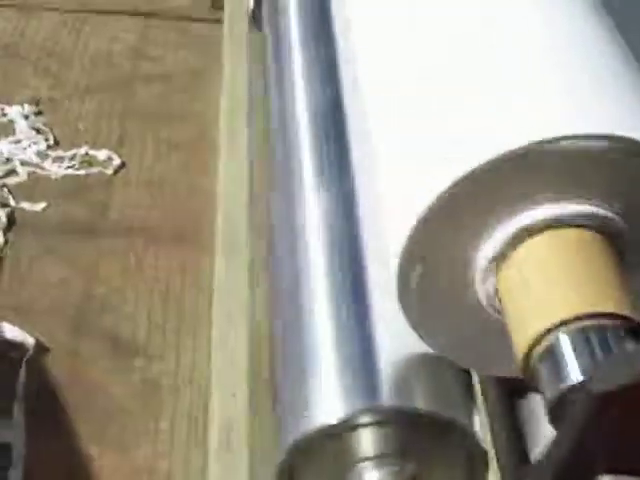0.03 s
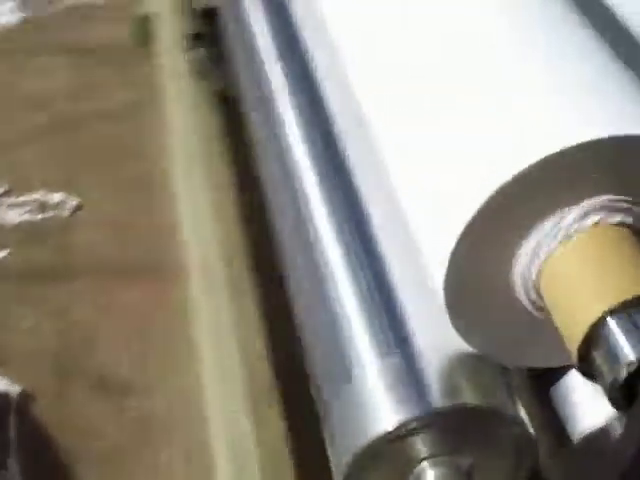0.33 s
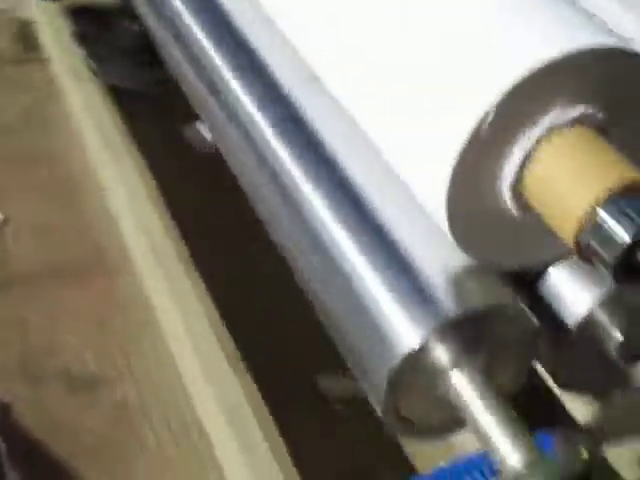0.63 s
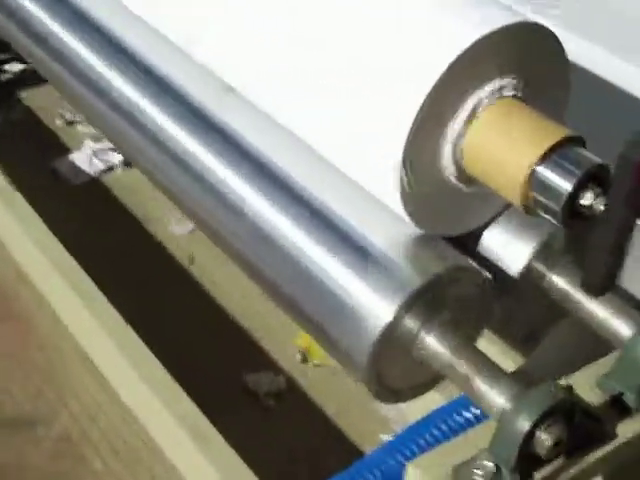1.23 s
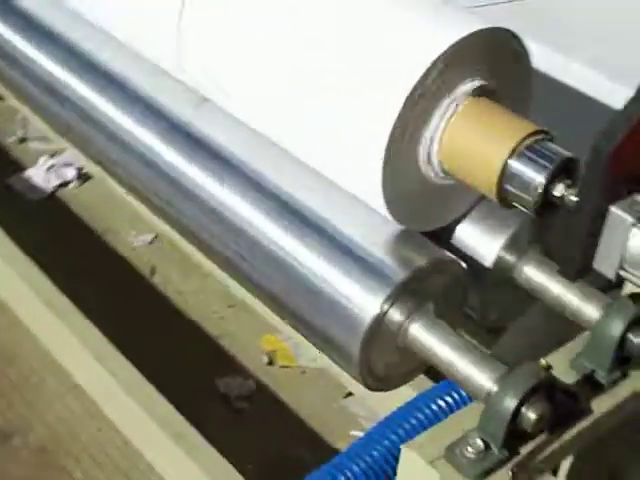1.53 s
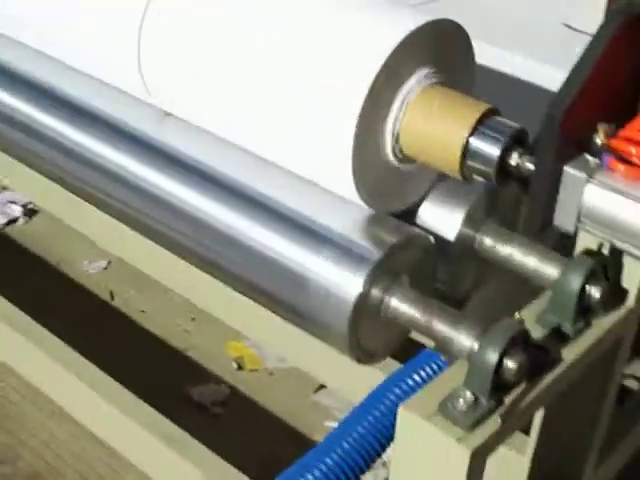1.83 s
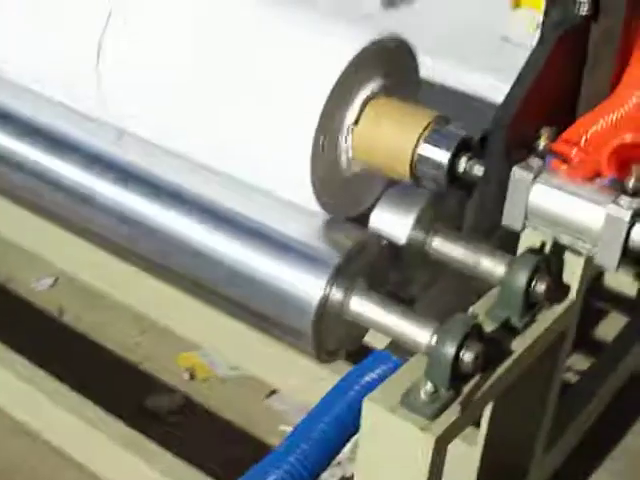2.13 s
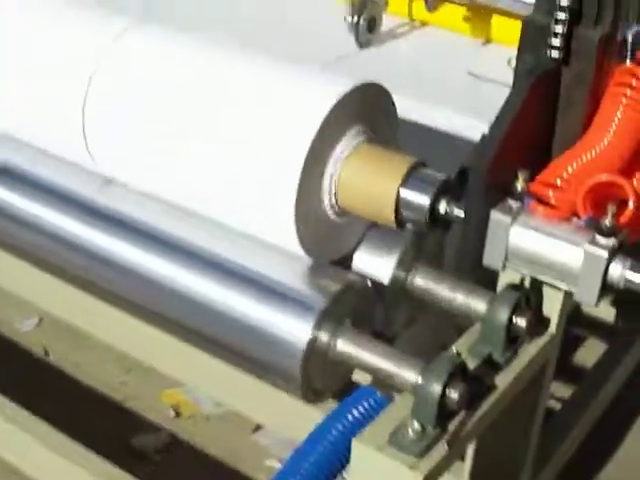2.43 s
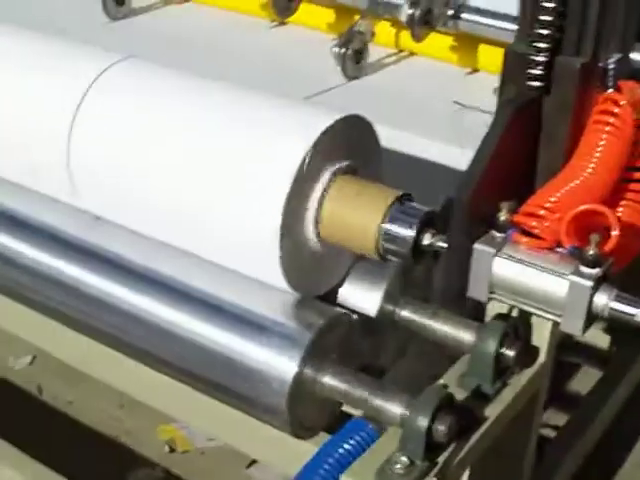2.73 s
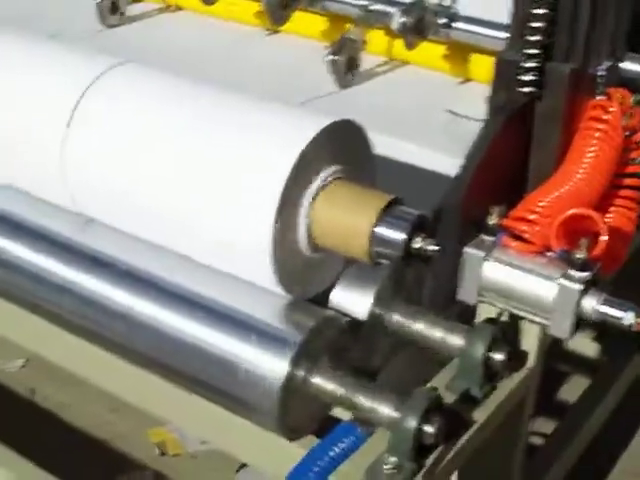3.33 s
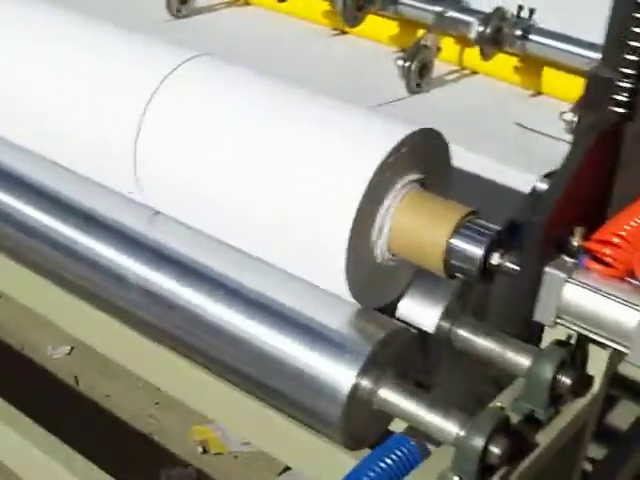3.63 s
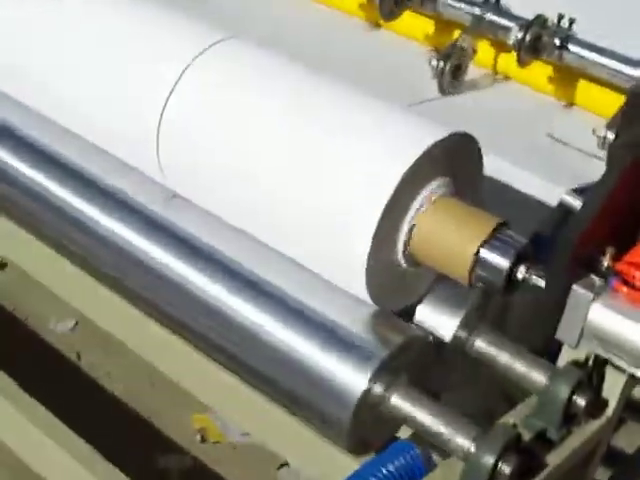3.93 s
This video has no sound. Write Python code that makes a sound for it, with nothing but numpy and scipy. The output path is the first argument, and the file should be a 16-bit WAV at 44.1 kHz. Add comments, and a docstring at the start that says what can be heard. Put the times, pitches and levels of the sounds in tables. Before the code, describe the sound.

Factory machine running with a loud roar, its steel rollers whining and squealing shrilly.

```python
"""A paper slitting machine runs in a factory hall while the listener walks along its rollers.
From the start rollers and frame roar and throb, faint tones hum and the paper web hisses, while rubbing
steel parts squeal in their middle and high modes, with brief squeaks from others. Near 1.4 s the paper
flicks and the background dips briefly. From 2 s the lowest of the three squealing modes takes over
and mixes with the middle one into combination tones; the high mode dies away before the end."""
import sys
import numpy as np
from scipy.fft import rfft, irfft
from scipy.io import wavfile

SR = 44100
rng = np.random.default_rng(int(sys.argv[2]) if len(sys.argv) > 2 else 0)


def file_out(sig):
    """Save sig as 16-bit WAV at sys.argv[1]."""
    # one column per channel
    cols = np.atleast_2d(sig).T
    # limit, then scale
    lim = np.clip(cols, -1, 1)
    pcm = np.round(lim * 32767).astype(np.int16)
    wavfile.write(sys.argv[1], SR, pcm)


N = 176400
TIME, FREQS = np.arange(N) / SR, np.arange(N // 2 + 1) * SR / N

# Spectra of the rollers and frame, and of the paper web: frequency_hz, density_db
ROAR_SPECTRUM = [(40, -93.5), (70, -82.5), (95, -78), (115, -67.5), (150, -65.5), (175, -58), (200, -63.5),
                 (238, -57.5), (270, -61.5), (420, -65.5), (470, -61.5), (540, -56.5), (590, -61),
                 (760, -61.5), (880, -61), (1050, -64.5), (1190, -63), (1270, -67.5), (1550, -66),
                 (1650, -68.5), (2020, -67), (2400, -69.5), (3000, -73.5), (3700, -80), (4200, -87.5),
                 (5000, -100)]
HISS_SPECTRUM = [(3000, -100), (4300, -86.5), (5000, -72.5), (5600, -68.5), (6200, -68.5), (6700, -67.5),
                 (7400, -71), (8000, -72.5)]
# Rise and fall of three roar bands and the hiss along the walk: time_s, relative_level_db
BASS_ROAR_LEVEL = [(0, -38.5), (1.05, -40.5), (1.17, -38.5), (1.41, -40), (1.439, -41.5), (2.3, -42),
                   (2.75, -40), (4, -41)]
MID_ROAR_LEVEL = [(0, -30.5), (.25, -29), (.6, -31.5), (1, -31.5), (1.25, -29), (1.42, -30), (1.43, -34),
                  (2.201, -33), (2.5, -31), (3.399, -31), (3.55, -33.5), (4, -32)]
UPPER_ROAR_LEVEL = [(0, -31.5), (.6, -33.5), (1.05, -32.5), (1.2, -31), (1.42, -31.5), (1.43, -34),
                    (2.3, -35), (2.48, -31.5), (3.47, -31.5), (3.52, -33.5), (4, -32.5)]
HISS_LEVEL = [(0, -33.5), (.6, -33), (1, -34.5), (1.2, -30), (1.42, -32.5), (1.43, -36.5), (2.1, -36),
              (2.5, -29.5), (3.3, -31), (4, -32.5)]
# Faint steady machine tones: pitch_hz, level_db
MACHINE_TONES = [(856.5, -42), (1168, -44.5), (1561, -46.5), (2008, -52)]
# Briefly excited modes: centre_s, length_s, pitch_hz, level_db
SQUEAKS = [(0.065, 0.34, 551.3, -34), (0.252, 0.5, 856.5, -37.5), (0.266, 0.12, 947, -38),
           (1.17, 0.094, 225.7, -32.5), (1.217, 0.31, 1327, -38), (1.233, 0.22, 6700, -38),
           (2.124, 0.13, 5540, -37.5), (2.383, 0.18, 5552, -29.5), (2.48, .05, 6675, -37),
           (2.49, 0.13, 3070, -42), (3.048, 0.035, 6700, -33), (3.246, 0.075, 3116, -36)]
# Buzz tones round the high mode: offset in steps of their spacing; level_db of each
BUZZ_STEPS = (-10, -2, 1, 2, 3, 4, 5)
BUZZ_DB = (-62, -54, -50, -46.5, -47, -46, -52.5)
# Envelopes of the three squealing modes: time_s, level_db
LOW = [(2.0, -55), (2.16, -40), (2.24, -40), (2.49, -26.5), (2.54, -30.0), (3.23, -28), (3.34, -22),
       (3.48, -20.5), (3.51, -25.5), (3.56, -22.0), (4.0, -23)]
MIDDLE = [(0, -27.5), (.27, -30), (.33, -40.5), (.39, -32), (.52, -50.5), (.58, -39.5), (.625, -49),
          (.66, -36), (.7, -46), (.83, -29), (.91, -38.5), (.93, -57), (1.029, -30), (1.33, -29),
          (1.44, -46.5), (1.53, -33), (1.62, -35), (1.67, -47.5), (2.06, -37), (2.11, -49), (2.36, -39.5),
          (2.71, -31), (2.76, -42), (2.86, -33.5), (3.31, -42), (3.37, -35), (3.45, -46.5), (4, -44)]
HIGH = [(0.0, -26.5), (0.1, -30), (0.14, -44.5), (0.17, -27.5), (0.32, -30), (0.54, -20), (0.64, -29.5),
        (0.66, -46.5), (0.69, -26.5), (0.82, -29.5), (0.88, -23.5), (1.04, -23), (1.18, -31), (1.24, -25.5),
        (1.34, -26.5), (1.37, -41.5), (1.4, -32.5), (1.51, -25), (1.61, -32), (1.8, -27.5), (1.84, -40.5),
        (1.88, -28.5), (1.93, -29), (2.03, -53.5), (2.08, -33), (2.15, -27), (2.3, -33.5), (2.43, -29.5),
        (2.47, -37.5), (3.0, -53), (3.04, -35), (3.7, -66.5)]
# Envelopes of the second and third harmonics: time_s, level_db
LOW_2 = [(2.35, -69.5), (2.48, -42), (2.82, -35.5), (2.88, -44.5), (3.04, -35), (3.08, -39.5),
         (3.27, -35.5), (3.37, -45), (3.7, -39), (3.92, -54), (3.96, -34), (4.0, -41)]
LOW_3 = [(2.7, -52.5), (2.73, -50), (3.45, -41.5), (3.55, -28.5), (3.689, -39), (3.79, -30.5),
         (3.92, -23.5), (4.0, -34.5)]
MIDDLE_2 = [(0.0, -35.5), (0.13, -44.5), (0.75, -33.5), (1.11, -52), (1.17, -40), (1.49, -46), (2.38, -50),
            (2.45, -37), (2.76, -39), (2.84, -36), (2.97, -48), (3.11, -38), (3.23, -54), (3.3, -34.5),
            (3.5, -39), (3.59, -49), (3.7, -35.5)]
MIDDLE_3 = [(0.0, -62.5), (0.05, -47), (0.2, -46), (0.29, -32.5), (0.33, -46.5), (0.41, -32.5),
            (0.6, -41.5), (0.79, -33), (0.839, -48), (0.908, -29.5), (1.04, -64.5), (1.11, -35),
            (1.139, -33), (1.189, -52), (1.26, -37.5), (1.501, -49), (1.56, -36.5), (1.601, -55),
            (1.66, -41), (1.87, -36), (1.95, -46), (2.3, -38.5)]
# Envelopes of the combination tones: time_s, level_db
SUM = [(2.2, -56), (2.31, -40.5), (2.49, -33.5), (2.84, -62.5), (3.45, -37.5), (3.51, -49), (3.66, -39.5),
       (3.93, -37), (4.0, -55)]  # low + middle
SUM_LOW = [(2.4, -47.5), (2.74, -30), (2.81, -42.5), (2.88, -28.5), (2.96, -29.5), (3.02, -41),
           (3.1, -32.5), (3.27, -32.5), (3.32, -48.5), (3.92, -34.5), (4.0, -46)]  # 2 low + middle
SUM_MIDDLE = [(2.2, -51.5), (2.74, -38), (3.6, -38.5), (3.65, -54.5), (3.72, -36.5), (4.0, -52.5)]  # low + 2 middle
DIFFERENCE = [(2.4, -50.0), (2.5, -32), (2.52, -44), (2.89, -26.5), (2.99, -40), (3.11, -36), (3.39, -57),
              (3.44, -33), (3.6, -46)]  # 3 middle - low
# Partials of the rubbing contact: low_multiple, middle_multiple, envelope
CONTACT_PARTIALS = [(1, 0, LOW), (0, 1, MIDDLE), (2, 0, LOW_2), (3, 0, LOW_3), (0, 2, MIDDLE_2),
                    (0, 3, MIDDLE_3), (1, 1, SUM), (2, 1, SUM_LOW), (1, 2, SUM_MIDDLE), (-1, 3, DIFFERENCE)]
# The recorder's response round half its sampling rate: frequency_hz, gain_db
ROLL_OFF = [(7300, 0), (7700, 0.5), (8000, -3.5), (8350, -9.5), (8680, -22), (9000, -34)]


def from_db(db):
    """Amplitude grows tenfold for every 20 dB."""
    return 10 ** (np.asarray(db) / 20)


def gain_at(spectrum, hz):
    """Gain of a spectrum, interpolated in decibels over log frequency."""
    frequency_hz, db = np.transpose(spectrum)
    return from_db(np.interp(np.log(hz + 1e-9), np.log(frequency_hz), db))


def high_pass(edge_hz, power):
    """A high-pass response: one half at the edge, falling as a power law below it."""
    return 1 / (1 + (edge_hz / (FREQS + 1)) ** power)


def drift(rate_hz):
    """Low-passed noise gives a slow random fluctuation of unit standard deviation."""
    slow = irfft(rfft(rng.standard_normal(N)) / (1 + (FREQS / rate_hz) ** 2), N)
    return slow / slow.std()


def envelope(curve):
    """Amplitude along a level curve, with exponential decay of 110 dB/s beyond its ends."""
    time_s, db = np.transpose(curve)
    outside_s = np.maximum(time_s[0] - TIME, 0) + np.maximum(TIME - time_s[-1], 0)
    return from_db(np.interp(TIME, time_s, db) - 110 * outside_s)


def swing(curve):
    """An envelope normalised to unit mean power."""
    gain = envelope(curve)
    return gain / np.sqrt(np.mean(gain ** 2))


def noise(spectrum, band_gain=1):
    """Filtering gives white noise the stated spectral density."""
    white = rfft(rng.standard_normal(N))
    return irfft(white * gain_at(spectrum, FREQS) * band_gain, N) * np.sqrt(SR / 2)


def phase_of(hz, wander_hz):
    """Phase is the integral of frequency, which here wanders randomly about its mean."""
    pitch_hz = hz + wander_hz * drift(rate_hz=9.07)
    return 2 * np.pi * (np.cumsum(pitch_hz) / SR + rng.random())


def hall_tone(phase, scatter, rate_hz):
    """Interference: a direct tone adds to its shifting hall reflections, at an rms near 1."""
    field = 1 + scatter * (drift(rate_hz) + 1j * drift(rate_hz))
    return np.real(field * np.exp(1j * phase)) * np.sqrt(2 / (1 + 2 * scatter ** 2))


def rollers():
    """Broadband roar: three bands share its power, each changing as the listener moves."""
    above_bass, above_mid = high_pass(edge_hz=395, power=8), high_pass(edge_hz=996, power=8)
    bands = [(1 - above_bass, BASS_ROAR_LEVEL),
             (above_bass * (1 - above_mid), MID_ROAR_LEVEL),
             (above_mid, UPPER_ROAR_LEVEL)]
    flutter = from_db(0.94 * drift(rate_hz=20))
    return flutter * sum(noise(ROAR_SPECTRUM, np.sqrt(share)) * swing(level) for share, level in bands)


def paper(flick_s=1.415, flick_half_s=0.0033, flick_edge_hz=6000):
    """Band-limited noise: the web hisses over the rollers and flicks once in the top of its band."""
    hiss = noise(HISS_SPECTRUM) * swing(HISS_LEVEL) * from_db(0.5 * drift(rate_hz=30))
    flick = from_db(11) * np.exp(-((TIME - flick_s) / flick_half_s) ** 2)
    return hiss + flick * noise(HISS_SPECTRUM, FREQS > flick_edge_hz)


def with_reflections(sound, delays_s=(0.01153, 0.01243), levels_db=(-11.5, -15)):
    """Comb filtering: two hard faces about two metres off send the treble back repeatedly."""
    echoes = sum(from_db(db) * np.exp(-2j * np.pi * FREQS * delay_s)
                 for db, delay_s in zip(levels_db, delays_s))
    return irfft(rfft(sound) / (1 - echoes * high_pass(edge_hz=2100, power=4)), N)


def throb(turns_per_s=4.47, peak_s=2.72, frame_hz=237.2, depth_db=5):
    """Amplitude modulation: a roll slightly out of true sets the frame booming once a turn."""
    turn = np.cos(2 * np.pi * turns_per_s * (TIME - peak_s))
    boom = hall_tone(phase_of(frame_hz, wander_hz=5), scatter=0.28, rate_hz=13)
    return from_db(-44 + depth_db * turn) * swing(BASS_ROAR_LEVEL) * boom


def machine_hum():
    """Superposition of faint steady machine tones, which swell with the roar's middle band."""
    hum = sum(from_db(db) * hall_tone(phase_of(hz, wander_hz=0.9), scatter=0.4, rate_hz=5.4)
              for hz, db in MACHINE_TONES)
    return swing(MID_ROAR_LEVEL) * hum


def squeaks():
    """Frictional excitation: other modes catch for a moment, swell and let go."""
    out = 0
    for centre_s, length_s, hz, db in SQUEAKS:
        swell = from_db(db) * np.exp(-np.abs(2 * (TIME - centre_s) / length_s) ** 3)
        out += swell * hall_tone(phase_of(hz, wander_hz=2.54), scatter=0.23, rate_hz=28)
    return out


def whistle(high_hz=5376.3, spacing_hz=86.7):
    """Friction excites the high mode; a faint buzz of tones rings round it, partly following its level."""
    high_phase = phase_of(high_hz, wander_hz=2.975)
    spacing_phase = phase_of(spacing_hz, wander_hz=1.2)
    buzz = sum(from_db(db) * hall_tone(high_phase + step * spacing_phase, scatter=1.1, rate_hz=11)
               for step, db in zip(BUZZ_STEPS, BUZZ_DB))
    mode = from_db(0.62) * envelope(HIGH) * hall_tone(high_phase, scatter=0.16, rate_hz=18)
    return mode + swing(HIGH) ** 0.43 * buzz  # the buzz follows 43% of the mode's swing in dB


def squeal(low_hz=2333.1, middle_hz=2655.7):
    """Nonlinear mixing: one rubbing contact adds harmonics and combination tones to two modes."""
    low_phase = phase_of(low_hz, wander_hz=0.76)
    middle_phase = phase_of(middle_hz, wander_hz=1.58)
    out = 0
    for m, n, level in CONTACT_PARTIALS:
        is_fundamental = abs(m) + abs(n) == 1
        scatter, rate_hz = (0.09, 20) if is_fundamental else (0.22, 15)
        partial = hall_tone(m * low_phase + n * middle_phase, scatter, rate_hz)
        roll_off = gain_at(ROLL_OFF, m * low_hz + n * middle_hz)
        out += envelope(level) * partial / roll_off  # each partial keeps its level through the roll-off
    return from_db(0.04) * out


def scene(dip_s=1.444, dip_half_s=0.018, dip_db=-3.5):
    """Superposition of all sources in mono; the background dips briefly after the flick."""
    rubbing_steel = squeal() + whistle() + squeaks()
    background = machine_hum() + throb() + with_reflections(rollers() + paper())
    dip = from_db(dip_db * np.exp(-((TIME - dip_s) / dip_half_s) ** 4))
    return (rubbing_steel + dip * background)[None]


def record(dry, notch_hz=4156, notch_half_hz=97, notch_db=-12.5, sampling_hz=16000, cutoff_hz=9000):
    """Imaging: after a notch, a low sampling rate mirrors the top of the band up to a steep cut."""
    notch = from_db(notch_db / (1 + ((FREQS - notch_hz) / notch_half_hz) ** 2))
    baseband = irfft(rfft(dry) * notch * (FREQS < sampling_hz / 2), N)
    mirrored = baseband * (1 + 2 * np.cos(2 * np.pi * sampling_hz * TIME))
    cut = np.clip((cutoff_hz + 30 - FREQS) / 80, 0, 1)
    return irfft(rfft(mirrored) * gain_at(ROLL_OFF, FREQS) * cut, N)


dry = scene()
out = record(dry)
file_out(out)
```